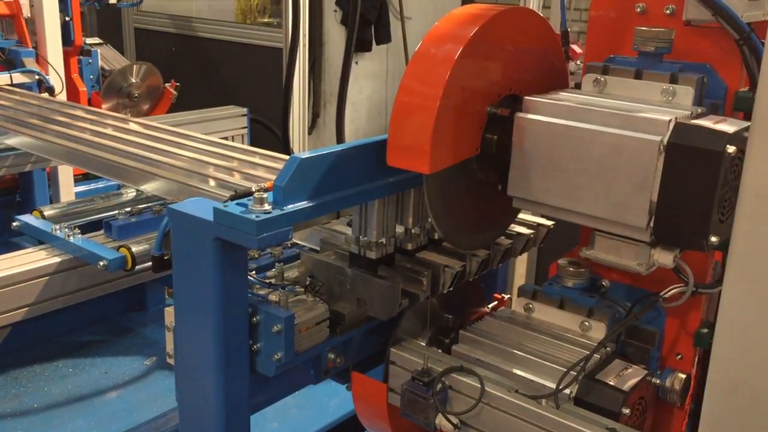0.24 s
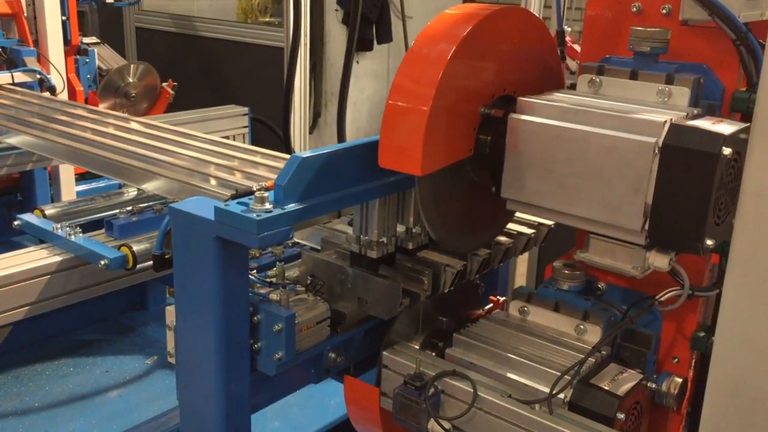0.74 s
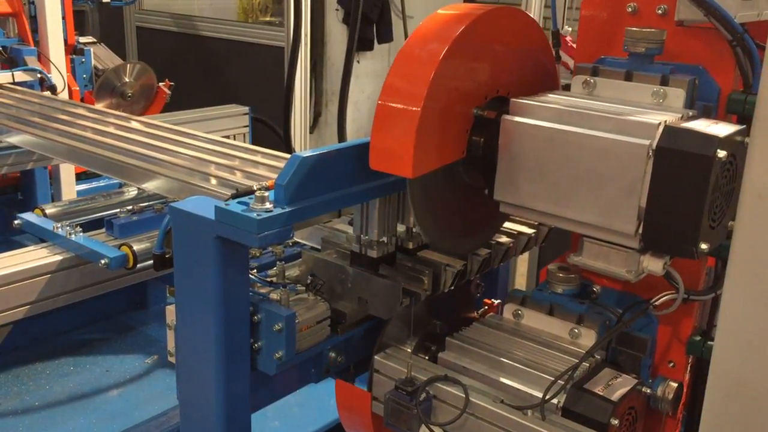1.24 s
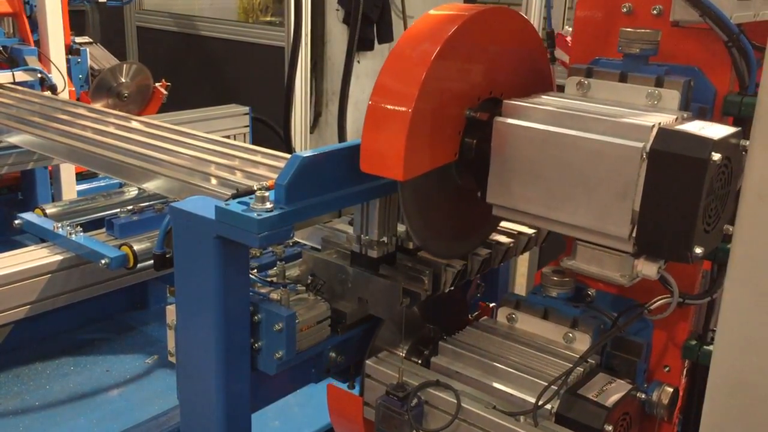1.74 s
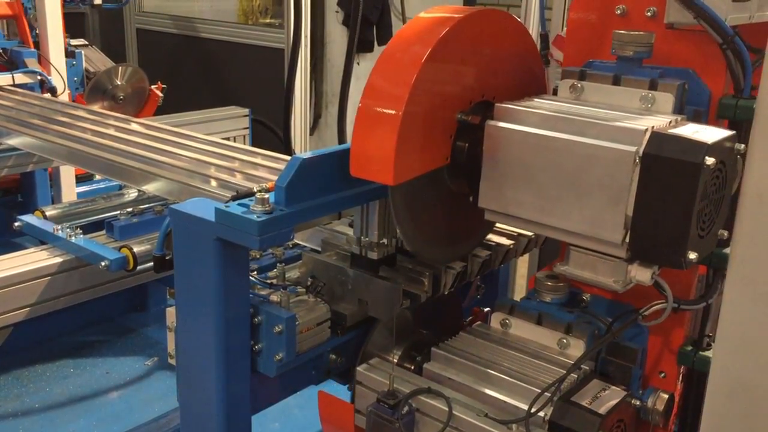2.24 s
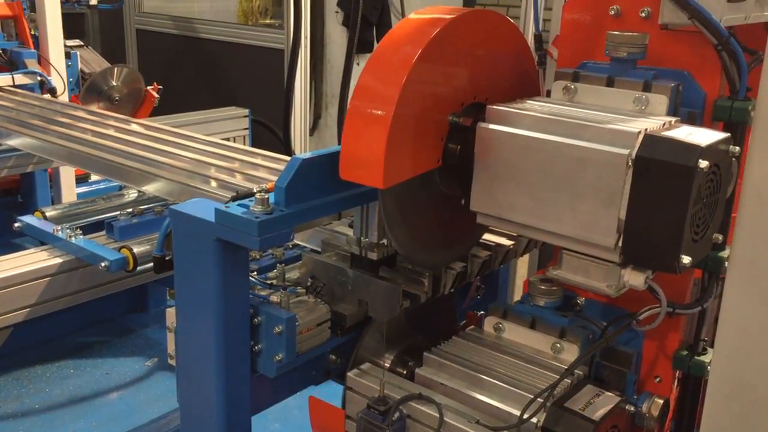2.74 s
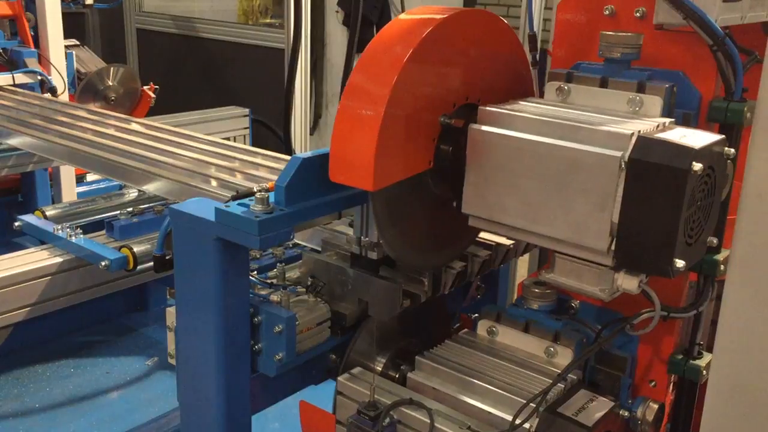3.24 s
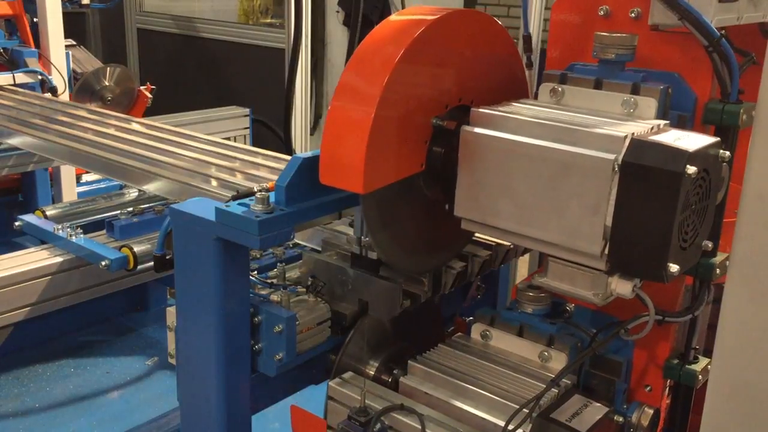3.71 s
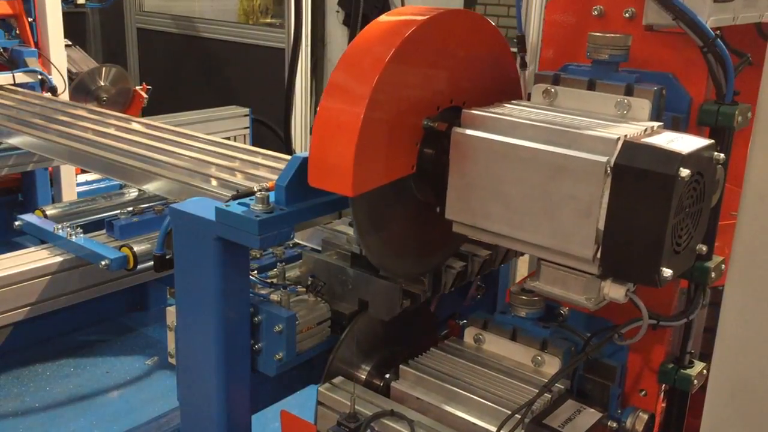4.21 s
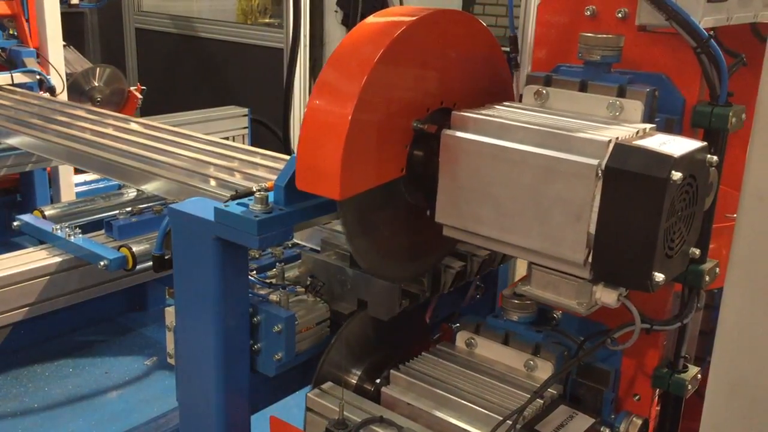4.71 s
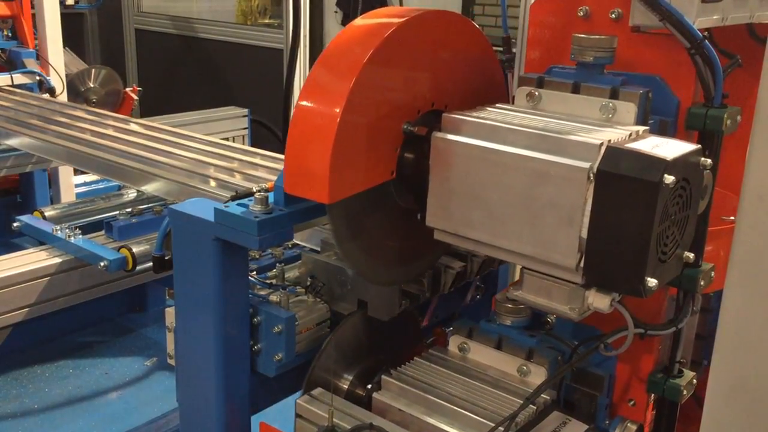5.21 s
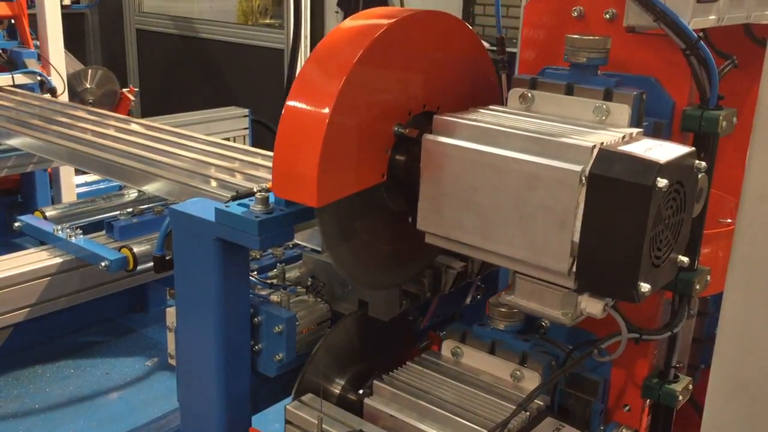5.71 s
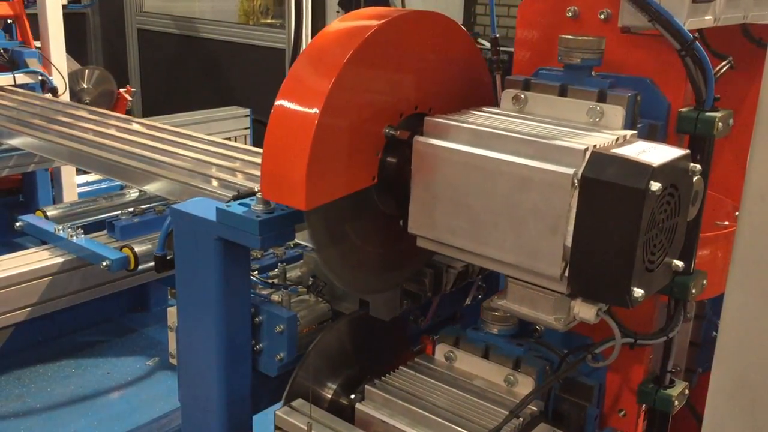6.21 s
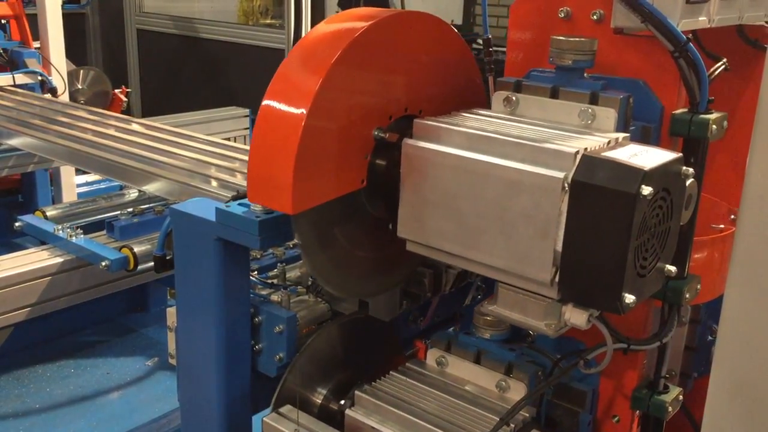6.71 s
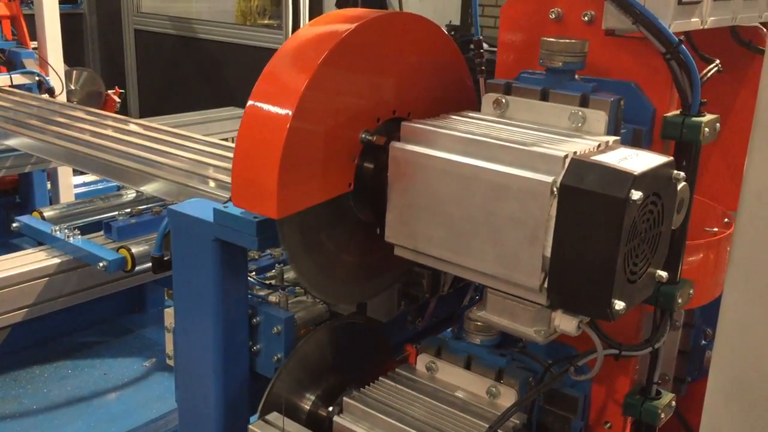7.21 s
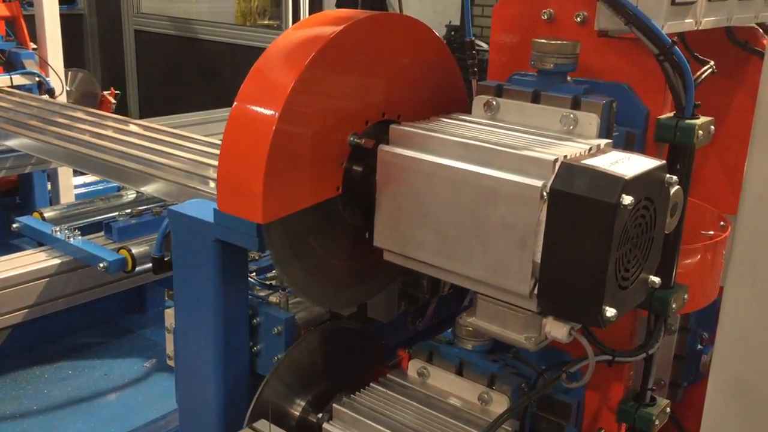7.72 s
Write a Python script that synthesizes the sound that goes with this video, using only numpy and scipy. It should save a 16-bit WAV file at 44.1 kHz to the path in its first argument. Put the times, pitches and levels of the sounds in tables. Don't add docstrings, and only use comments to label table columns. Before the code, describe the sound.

Harsh metallic milling of hollow aluminium in a workshop, shrill and fluttering, ends in a howl and scrapes, leaving steady machine hum and whoosh.

```python
import sys
import numpy as np
from scipy import signal
from scipy.fft import rfft, irfft, next_fast_len
from scipy.io import wavfile
from scipy.ndimage import uniform_filter1d, map_coordinates

SR = 44100
rng = np.random.default_rng(int(sys.argv[2]) if len(sys.argv) > 2 else 0)


def to_linear_factor(level_db):
    exponent = np.asarray(level_db, float) / 20
    return 10 ** exponent


def generate_wav(sig):
    pcm = np.round(np.clip(np.atleast_2d(sig).T, -1, 1) * 32767).astype(np.int16)
    wavfile.write(sys.argv[1], SR, pcm)


N = 350595
T = np.arange(N) / SR

TEETH = 108
TOP_HZ = 15740
OCTAVE_BEAT_S, OCTAVE_NULL_S, OCTAVE_BEAT_DEPTH = 0.135, 0.357, 0.92
NEAR_LINES_DB, FAR_LINES_DB, FREE_DB, SETTLED_S, SETTLED_DB = -40, -55, 5, 3.1, -9
LOW_GROWS, MID_GROWS = 0.35, 1.24
UP_SHIFTS, RIM_SHIFTS, WEB_SHIFTS = 0.77, -0.63, 0.12
FLANGE_RESTS = .85
EDGE_SAG_HZ_PER_S = 450
HIGH_SPOT_DB, HIGH_SPOT_SCATTER_DB = 9, 1
RUMBLE_DB = -16
MAINS_DB, MAINS_GROWS, FIRST_DB, FIRST_GROWS = -49.5, 0.61, -48, 1.32
RIDGE_FLICKER_DB, RIDGE_WANDER = 2.5, .6
PLUCK_HZ, PLUCK_UPPER_HZ, PLUCK_UPPER_DB = 1810, 3590, -9.5

# (time [s], tooth rate [Hz], whistle level [dB], octave level [dB])
SPINDLE = [(0, 5386, -28, -30), (.2, 5388, -24, -30), (.42, 5379, -24, -27), (.51, 5361, -22, -33),
           (.68, 5371, -18, -39), (.84, 5362, -21, -33), (1.05, 5367, -21, -31), (1.25, 5365, -26, -34),
           (1.39, 5374, -31, -35), (1.52, 5382, -21, -30), (1.69, 5360, -24, -36), (1.74, 5380, -24, -31),
           (2.0, 5387, -22.5, -31), (2.3, 5385, -24, -32), (2.6, 5389, -30, -42), (2.92, 5390, -34, -40),
           (4.2, 5387, -35, -42), (4.42, 5390, -43, -62)]
# (peak time [s], level [dB], rise [s], fall for 10 dB [s])
WHISTLE_SWELLS = [
    (.43, -13.5, 0.056, .045),
    (.845, -27, .04, .07),
    (.912, -22, .07, .045),
    (1.19, -24.5, 0.053, .09),
    (1.27, -22, 0.038, .013),
    (1.672, -15, .12, 0),
]
# (time [s], depth [dB], half width [s])
WHISTLE_NULLS = [
    (.51, 7, 0.025),
    (.788, 18, 0.021),
    (1.11, 16, 0.041),
]
# (peak time [s], level [dB], rise [s], fall for 10 dB [s])
OCTAVE_SWELLS = [
    (.576, -33, .04, .09),
    (.805, -25.5, 0.038, 0.15),
    (1.24, -32.5, .05, 0.15),
]
# (time [s], level [dB])
HALF_RATE = [
    (.7, -70),
    (.76, -37),
    (.95, -43),
    (1.0, -54),
    (1.08, -35),
    (1.38, -36),
    (1.46, -70),
]
# (time [s], frequency [Hz], level [dB])
SQUEAL = [
    (0.99, 2270, -38),
    (1.056, 2354, -22),
    (1.19, 2324, -17.5),
    (1.254, 2255, -30),
    (1.28, 2369, -34),
]
LINES_ABOVE_DB = [0, -1, -7, -6]
LINES_BELOW_DB = [-9, -7, -6, -10]
# (time [s], level [dB], pitch shift [share])
SHAKE = [(.06, -42, -0.012), (.11, -25.5, -0.002), (.49, -19.5, 0.0067), (.58, -22, -.03), (.62, -31, 0),
         (1.4, -33.5, 0.0033), (1.62, -29, .03), (1.8, -39, -0.032), (1.97, -28.5, -0.0074),
         (2.37, -24, .02), (2.48, -27, -0.057), (2.52, -36, -.02), (2.91, -30, 0.0063), (2.97, -28, 0.0072),
         (3.24, -32, 0.0018), (3.76, -23, -0.073), (4.11, -16, 0.08), (4.33, -18, -.04)]
# (time [s], level [dB])
CONTACT = [(0, -44), (.015, -36), (.35, -31.5), (.585, -34), (.63, -46), (.84, -42), (1.25, -40.5),
           (1.4, -42), (2.47, -34), (2.57, -47), (2.92, -38), (2.94, -34), (3.03, -38), (3.08, -33.5),
           (3.2, -36.5), (3.5, -31.5), (4.31, -33), (4.37, -40)]
WALL_S = [
    .62,
    2.14,
    2.9,
    3.5,
]
# (low [dB], middle [dB], upper [dB])
WALL_DB = [(-13, -4.5, -2.5), (-15, -17, 0.5), (-7.5, -1, -1), (-2.5, -16, 0.5), (-3.5, -3.5, -1.5)]
# (low [Hz], middle [Hz], upper [Hz])
WALL_HZ = [(1510, 1870, 3900), (1533, 1830, 3910), (1516, 1887, 3930), (1513, 1850, 3850),
           (1480, 1863, 4030)]
# (rim [dB], web [dB], edge [dB], chips [dB])
DISC_DB = [(5, 4, -5, 1), (-1, 1.2, -4, 0.5), (-3, 4.5, -7, 1.5), (7.5, 6, 5, -1), (6.5, 2.5, 4, -0.3)]
# (rim [Hz], web [Hz], edge [Hz])
DISC_HZ = [(7300, 8830, 14650), (7180, 8830, 14750), (7020, 8800, 14250), (7200, 8990, 14300),
           (7070, 9030, 14200)]
# (frequency [Hz], width [Hz])
LOW_MODES = [(1450, 45), (1485, 12), (1550, 8)]
MID_MODES = [(1700, 110), (1790, 53), (1860, 29), (1920, 77), (1980, 10), (2060, 50)]
UP_MODES = [(3250, 170), (3450, 23), (3680, 36), (3900, 58), (4040, 170), (4230, 52), (4400, 150),
            (4580, 210)]
RIM_MODES = [(6720, 55), (6900, 120), (7160, 110), (7340, 73), (7600, 130)]
WEB_MODES = [(8810, 70), (9040, 36)]
EDGE_MODES = [(13850, 110), (14150, 110), (14480, 120), (14800, 250)]
# (start [s], length [s])
BETWEEN = (2.52, 0.41)
# (peak time [s], level [dB], rise [s], fall for 10 dB [s])
FLANGE_SWELLS = [
    (.12, -28, .05, 0.3),
    (.74, -33, .06, 0.2),
    (1.62, -25.5, .17, 0.45),
    (1.86, -32, 0.056, 0.4),
    (2.49, -26, .08, 0.1),
    (2.97, -27, 0.048, 0.4),
    (3.1, -24, 0.027, 0.2),
    (4.31, -28, 0.096, 8),
]
# (peak time [s], level [dB], rise [s], fall for 10 dB [s])
EDGE_SONG = [(3.8, -28, .2, .3)]
# (time [s], depth [dB], half width [s])
EDGE_FADE = [(4.28, 9.6, 0.16)]
# (frequency [Hz], density [dB per Hz])
CHIPS = [(530, -50), (900, -22.5), (1470, 1), (3720, -2.5), (5080, -8), (5460, -3.5), (6300, -8.5),
         (7270, -7), (11900, -8), (14300, -9), (15600, -12)]
# (time [s], roar level [dB])
GAIN = [(0, -27.5), (.4, -26.5), (.8, -30), (1.8, -31), (2.5, -30), (2.9, -25), (3.4, -23), (3.9, -24),
        (4.35, -26), (4.66, -28), (4.9, -23.5), (5.1, -21), (7.95, -20.5)]
# (frequency [Hz], density [dB per Hz])
ROAR = [(530, -34), (900, -12.5), (1370, -4.5), (1520, -5), (1890, 0), (2370, -1), (2570, -1), (4150, -7),
        (5020, -12.5), (6450, -13), (8290, -16.5), (10500, -19), (12000, -20), (15600, -21)]
RUMBLE = [(28, -41), (48, -11.5), (97, -2.5), (192, -5), (241, -5), (455, -3), (609, -6), (1000, -9),
          (1300, -20), (2200, -120)]
# (frequency [Hz], level [dB])
MOTORS = [(667.5, -54), (899, -53), (2045, -43), (3778, -42), (4000, -41), (4221, -45), (4801, -41.5),
          (8000, -51), (11978, -60)]
# (time [s], level over roar [dB])
SECOND_MOTOR = [(.2, -19), (1.55, -12), (2.6, -21), (3.56, -12), (4.6, -12), (5.55, -16.5), (6.1, -24),
                (7.95, -21.5)]
# (peak time [s], level [dB], rise [s], fall for 10 dB [s])
THUD = [(3.75, -49, .5, -0.5)]
# (start [s], length [s], frequency [Hz], width [Hz], level [dB])
RIDGES = [(.1, .12, 1845, 20, -33), (.1, .08, 1500, 30, -32), (.3, .07, 1860, 35, -30),
          (.37, .13, 1950, 60, -28), (.44, .17, 1790, 40, -28), (.35, .19, 3550, 120, -27),
          (.38, .11, 3200, 70, -29), (.39, .19, 4230, 60, -31), (.22, .12, 3980, 120, -30),
          (2.0, .1, 2200, 50, -38), (2.13, .08, 3650, 40, -33), (2.24, .15, 3910, 50, -31),
          (2.3, .08, 4400, 40, -34), (2.42, .1, 1552, 12, -30), (2.42, .07, 3850, 40, -33),
          (2.17, .04, 1900, 60, -30), (2.24, .1, 1910, 50, -31), (3.84, .26, 3450, 40, -32),
          (4.03, .19, 4200, 150, -25), (4.06, .18, 3910, 30, -29), (3.83, .09, 1900, 200, -24),
          (4.16, .17, 1970, 50, -25), (4.24, .08, 1500, 30, -30), (3.5, .3, 12400, 80, -40),
          (2.93, .5, 13850, 200, -39), (4.472, .14, 7200, 80, -35), (4.475, .135, 14050, 200, -42),
          (3.45, .6, 1465, 30, -33), (3.47, .1, 1650, 60, -31), (3.62, .22, 1750, 70, -33),
          (3.5, .22, 2320, 40, -34), (3.68, .12, 4150, 200, -30), (3.84, .15, 4150, 250, -28),
          (.25, .15, 1470, 30, -33),
          (.94, .065, 9900, 120, -36), (.99, .045, 9620, 100, -34), (1.02, .04, 9350, 120, -35),
               (.565, .04, 8850, 80, -32), (1.04, .13, 8400, 10, -43), (1.15, .08, 10050, 15, -42),
               (1.25, .045, 7300, 400, -36), (1.255, .035, 11600, 800, -38), (1.9, .6, 14250, 300, -41),
               (3.12, .25, 9035, 15, -36), (4.06, .2, 6650, 60, -35), (2.6, 1.2, 15500, 300, -43)]
# (start [s], length [s], frequency [Hz], width [Hz], level [dB])
CHIRPS = [(1.25, 0.045, 6200, 400, -28), (1.278, 0.39, 2250, 83, -33), (3.075, 0.06, 990, 60, -36),
          (3.2, .5, 2495, 50, -35), (3.45, 0.38, 3700, 25, -32), (3.09, 0.035, 2200, 150, -26),
          (3.66, 0.67, 5790, 30, -41), (3.45, .5, 3660, 40, -36), (0.11, 0.5, 2400, 100, -40),
          (3.088, .032, 1600, 10, -21), (3.062, .06, 8750, 40, -28), (.51, .12, 7140, 30, -31),
         (.62, .36, 9750, 150, -42), (4.17, .16, 1800, 35, -22), (4.472, .145, 8930, 90, -32),
         (3.063, .035, 5050, 80, -29)]
# (start [s], length [s], frequency [Hz], level [dB])
NOTES = [(3.3, .4, 9035, -32), (.11, .3, 1470, -35), (.77, .27, 4040, -35), (1.25, .45, 4120, -39),
         (.7, .5, 4580, -43), (1.36, .44, 1552, -32), (1.79, .12, 3490, -33.5), (1.8, .08, 1920, -33),
         (1.95, .18, 3610, -33), (2.4, .1, 3580, -32), (2.93, .075, 1478, -27), (2.15, .15, 4400, -34)]
# (time [s], peak level [dB], length [s])
RATTLE = [(3.075, -8, .008), (3.085, -6, .004), (3.096, -11, .006), (3.105, -5, .005), (3.112, -9, .007),
          (3.123, -8, .004), (3.146, -5, .005), (3.154, -12, .004), (3.165, -11, .007)]
# (frequency [Hz], width [Hz], level [dB])
OFFCUT_MODES = [(1640, 63, 0), (1960, 42, -13), (2270, 44, 2), (3040, 21, -4), (3270, 19, -3),
                (3650, 100, -8), (4400, 150, -11), (5000, 49, -13)]
# (time [s], peak level [dB], length [s])
GRAZES = [
    (4.477, -5, 0.012),
    (4.513, -14, 0.01),
    (4.521, -5, 0.015),
    (4.547, -8, 0.012),
    (4.577, -6, 0.006),
    (4.585, -9, .016),
]
# (frequency [Hz], width [Hz], level [dB])
GRAZED_MODES = [(1780, 65, 2), (3550, 32, 0), (3890, 39, -7), (4100, 49, -8), (4520, 150, -13),
                (5300, 25, -15), (7150, 64, -14), (8850, 91, -10), (9550, 44, -16), (14050, 130, -19)]
# (time [s], frequency [Hz], level [dB])
HOWL = [
    (3.86, 1960, -36),
    (3.92, 1972, -27),
    (4.0, 1985, -19),
    (4.06, 2015, -17),
    (4.13, 2040, -19),
    (4.18, 2040, -25),
    (4.22, 2030, -45),
]
# (peak time [s], level [dB], rise [s], fall for 10 dB [s])
PLUCKS = [
    (4.48, -14, .005, .006),
    (4.522, -12, .007, .005),
    (4.547, -18, .004, .006),
    (4.583, -14, .008, .006),
]


def curves(rows, off=None):
    times_s, *columns = np.transpose(rows)
    return [np.interp(T, times_s, column, off, off) for column in columns]


def unit(x):
    return x / np.sqrt(np.mean(np.abs(x) ** 2) + 1e-20)


def wobble(rate_hz):
    return map_coordinates(rng.standard_normal(int(N * rate_hz / SR) + 4), [T * rate_hz])


def cycles(hz):
    return 2 * np.pi * np.cumsum(hz * np.ones(N)) / SR


def gate(start_s, length_s, edge_s):
    return np.clip(np.minimum(T - start_s, start_s + length_s - T) / edge_s, 0, 1)


def swells(rows):
    return sum(to_linear_factor(db - 10 * ((T - s) / np.where(T < s, rise_s, fall_s)) ** 2) for s, db, rise_s, fall_s in rows)


def nulls(rows):
    return to_linear_factor(-sum(db * np.exp(-((T - s) / width_s) ** 2) for s, db, width_s in rows))


def ringing(hz, width_hz):
    drift = rng.standard_normal((2, N))
    for poles in (1, 3):
        drift = signal.lfilter([1], [1, -np.exp(-poles * np.pi * width_hz / SR)], drift)
    phase = cycles(hz)
    return unit(drift[0] * np.cos(phase) + drift[1] * np.sin(phase))


def rush(spectrum, patchy_db):
    bins = signal.stft(rng.standard_normal(N), nperseg=512)[2]
    patches = uniform_filter1d(uniform_filter1d(rng.standard_normal(bins.shape), 6, 0), 12, 1)
    noise = signal.istft(bins * to_linear_factor(patchy_db * unit(patches)), nperseg=512)[1][:N]
    hz, db = np.transpose(spectrum)
    size = next_fast_len(N)
    log_hz = np.log(np.fft.rfftfreq(size, 1 / SR) + 1)
    colour = to_linear_factor(np.interp(log_hz, np.log(hz), db, left=-120))
    return unit(irfft(rfft(noise, size) * colour, size)[:N])


def runout(tooth):
    def line(phase, db):
        return to_linear_factor(db) * np.sin(phase + rng.uniform(0, 2 * np.pi))

    settled_db = SETTLED_DB * gate(SETTLED_S - .15, N / SR, .3)
    turn, orders = tooth / TEETH, range(1, 13)
    near = sum(line(tooth + k * turn, db + 3.4 * wobble(4.9)) for k, db in zip(orders, LINES_ABOVE_DB))
    near += sum(line(tooth - k * turn, db + 1.5 * wobble(4.9)) for k, db in zip(orders, LINES_BELOW_DB))
    far = 0
    for k in orders:
        far = far + line(2 * tooth + k * turn, rng.normal(0, 3) - .4 * k)
        far = far + line(2 * tooth - k * turn, rng.normal(0, 3) - .8 * k)
    far_db = FAR_LINES_DB + FREE_DB * gate(*BETWEEN, .1) + settled_db / 4
    return to_linear_factor(NEAR_LINES_DB + settled_db) * near + to_linear_factor(far_db) * far


def squeal(tooth):
    wall_hz, wall_db = curves(SQUEAL)
    wall = cycles(wall_hz)
    mixed = to_linear_factor(-17.5) * np.sin(tooth - wall) + to_linear_factor(-19) * np.sin(tooth + wall)
    mixed += to_linear_factor(-16) * np.sin(2 * tooth + wall) + to_linear_factor(-25) * np.sin(2 * tooth - wall)
    mixed += to_linear_factor(-29) * np.sin(2 * wall)
    return to_linear_factor(wall_db) * gate(0.97, 0.34, .03) * (np.sin(wall) + mixed)


def whistle():
    hz, db, octave_db = curves(SPINDLE)
    tooth = cycles(hz)
    base = (to_linear_factor(db) + swells(WHISTLE_SWELLS)) * nulls(WHISTLE_NULLS) * to_linear_factor(0.69 * wobble(40.24))
    dip = 1 - np.abs(np.sin(np.pi * (T - OCTAVE_NULL_S) / OCTAVE_BEAT_S))
    beat = 1 - OCTAVE_BEAT_DEPTH * gate(0.27, 1.15, 0.073) * dip
    octave = beat * to_linear_factor(octave_db + 1.2 * wobble(40.0) + 1.3 * wobble(5.8)) + swells(OCTAVE_SWELLS)
    strikes = base * np.sin(tooth) + octave * np.sin(2 * tooth) + runout(tooth)
    halves = np.sin(tooth / 2) + to_linear_factor(-11) * np.sin(1.5 * tooth) + to_linear_factor(-7) * np.sin(2.5 * tooth)
    halves *= to_linear_factor(curves(HALF_RATE)[0] + 3.0 * wobble(11.9))
    return np.sqrt(2) * (gate(-0.98, 5.6, .06) * strikes + halves + squeal(tooth))


def family(modes, centre_hz, reach_hz, flicker_db):
    shares = [np.exp(-((hz - centre_hz) / reach_hz) ** 2) + .02 for hz, _ in modes]
    rung = sum(share * to_linear_factor(flicker_db * wobble(18)) * ringing(hz, width_hz)
               for share, (hz, width_hz) in zip(shares, modes))
    return unit(rung / np.sqrt(np.sum(np.square(shares), axis=0)))


def by_wall(rows):
    values = np.array(rows, float)[np.searchsorted(WALL_S, T)].T
    return uniform_filter1d(values, size=SR // 24, axis=1)


def chatter(turn):
    sink = (turn / (2 * np.pi)) % 1
    gain = to_linear_factor(-HIGH_SPOT_DB * sink + HIGH_SPOT_SCATTER_DB * wobble(50))
    return np.where(T > WALL_S[2], unit(uniform_filter1d(gain, size=SR // 500)), 1)


def profile():
    shake_db, shift = curves(SHAKE)
    over_db = shake_db + 25
    low_db, mid_db, up_db = by_wall(WALL_DB)
    low_hz, mid_hz, up_hz = by_wall(WALL_HZ)
    low = to_linear_factor(low_db + LOW_GROWS * over_db - 31.0) * (1 - FLANGE_RESTS * gate(*BETWEEN, .02))
    low += to_linear_factor(-10.0) * swells(FLANGE_SWELLS)
    mid = to_linear_factor(mid_db + MID_GROWS * over_db - 29.5)
    up = to_linear_factor(up_db + shake_db - 1.5)
    rung = low * family(LOW_MODES, low_hz, reach_hz=35, flicker_db=0.5)
    rung += mid * family(MID_MODES, mid_hz * (1 + shift), reach_hz=100, flicker_db=1.5)
    return rung + up * family(UP_MODES, up_hz * (1 + UP_SHIFTS * shift), reach_hz=645, flicker_db=1.0)


def disc_and_chips(turn):
    shift = curves(SHAKE)[1]
    rim_db, web_db, edge_db, chips_db = by_wall(DISC_DB) + curves(CONTACT)[0]
    rim_hz, web_hz, edge_hz = by_wall(DISC_HZ)
    rim_hz = rim_hz * (1 + RIM_SHIFTS * shift)
    web_hz = web_hz * (1 + WEB_SHIFTS * shift)
    edge_hz = edge_hz - EDGE_SAG_HZ_PER_S * np.clip(T - 3.85, -.35, .5)
    rim = to_linear_factor(rim_db - 3.0) * np.sqrt(chatter(turn))
    edge = (to_linear_factor(edge_db + 2.0) + swells(EDGE_SONG)) * nulls(EDGE_FADE) * chatter(turn)
    web = 0.84 * family(WEB_MODES, web_hz, reach_hz=110, flicker_db=0.5) + 0.72 * ringing(web_hz, 380)
    disc = rim * family(RIM_MODES, rim_hz, reach_hz=387, flicker_db=2)
    disc += to_linear_factor(web_db - 1.4) * web
    disc += edge * family(EDGE_MODES, edge_hz, reach_hz=330, flicker_db=1.5)
    disc *= 1 - 0.5 * gate(*BETWEEN, 0.018)
    return disc + to_linear_factor(chips_db + 10) * rush(CHIPS, patchy_db=2.1)


def cut():
    turn = cycles(curves(SPINDLE)[0] / TEETH + 0.73 * wobble(5.07))
    pulse_db = 1.7 * np.sin(turn) + .6 * np.sin(2 * turn + 1) + .9 * np.sin(4 * turn) + 1.05 * wobble(30)
    return gate(-1, 5.345, .025) * unit(to_linear_factor(pulse_db)) * (profile() + disc_and_chips(turn))


def shop():
    roar_db, = curves(GAIN)
    over_db = roar_db + 25
    noise = to_linear_factor(roar_db + RUMBLE_DB) * rush(RUMBLE, patchy_db=1.16)
    noise += to_linear_factor(roar_db + 0.17 * wobble(9)) * rush(ROAR, patchy_db=0.5)
    noise += swells(THUD) * rush([(28, -24.5), (50, 0), (110, -4), (200, -30)], patchy_db=1.0)
    mains = to_linear_factor(MAINS_DB + MAINS_GROWS * over_db + 1.3 * wobble(2.02)) * nulls([(4.7, 4.5, 0.24)])
    first = to_linear_factor(FIRST_DB + FIRST_GROWS * over_db)
    second = to_linear_factor(roar_db + curves(SECOND_MOTOR)[0]) * nulls([(6.64, 11, 0.037)])
    hum = mains * np.sin(cycles(100))
    hum += first * np.sin(cycles(244.3 + 0.26 * wobble(1.85)))
    hum += second * np.sin(cycles(449.2 + 0.4 * wobble(1.97)))
    tones = sum(to_linear_factor(db + 1.5 * wobble(4)) * np.sin(cycles(hz + 1.5 * wobble(6))) for hz, db in MOTORS)
    return noise + np.sqrt(2) * (hum + to_linear_factor(roar_db + 21) * tones)


def ridges():
    total = np.zeros(N)
    for start_s, length_s, hz, width_hz, db in RIDGES:
        wander_hz = RIDGE_WANDER * width_hz * wobble(30 + width_hz)
        ragged = to_linear_factor(RIDGE_FLICKER_DB * wobble(45)) * np.sin(cycles(hz + wander_hz))
        total += to_linear_factor(db) * gate(start_s, length_s, length_s / 6) * ragged
    return np.sqrt(2) * total


def chirps():
    total = np.zeros(N)
    for start_s, length_s, hz, width_hz, db in CHIRPS:
        total += to_linear_factor(db) * gate(start_s, length_s, length_s / 6) * ringing(hz, width_hz)
    for start_s, length_s, hz, db in NOTES:
        note = to_linear_factor(2.5 * wobble(25)) * np.sqrt(2) * np.sin(cycles(hz + 9 * wobble(20)))
        total += to_linear_factor(db) * gate(start_s, length_s, 0.024) * note
    return total


def touches(events, modes, hiss, rise_s, tail_s):
    body = sum(to_linear_factor(db) * np.sqrt(width_hz) * ringing(hz, 2.0 * width_hz) for hz, width_hz, db in modes)
    scrape = unit(body) + hiss * rush(CHIPS, patchy_db=-3.0)
    scrape = scrape / np.sqrt(np.abs(uniform_filter1d(scrape ** 2, size=SR // 120)) + .05)
    level = np.zeros(N)
    for s, db, length_s in events:
        after_s = np.maximum(T - (s - .003), 0)
        decay = np.exp(-(after_s / length_s) ** 2) + .25 * to_linear_factor(-60 * after_s / tail_s)
        level += to_linear_factor(db - 9.0) * np.minimum(after_s / rise_s, 1) * decay
    return scrape * level


def grazes():
    offcut = touches(RATTLE, OFFCUT_MODES, hiss=0.38, rise_s=0.0015, tail_s=0.08)
    return offcut + touches(GRAZES, GRAZED_MODES, hiss=0.39, rise_s=0.0035, tail_s=0.31)


def howl():
    hz, db = curves(HOWL)
    tone = gate(3.85, .38, .02) * to_linear_factor(db + 2.5 * wobble(35)) * np.sin(cycles(hz + 16 * wobble(45)))
    lower = np.sin(cycles(PLUCK_HZ + 25 * wobble(40)))
    upper = to_linear_factor(PLUCK_UPPER_DB + 2.2 * wobble(60)) * np.sin(cycles(PLUCK_UPPER_HZ + 80 * wobble(90)))
    return np.sqrt(2) * (tone + swells(PLUCKS) * (lower + upper))


def scene():
    mono = whistle() + cut() + shop() + ridges() + chirps() + grazes() + howl()
    return np.tile(mono, (2, 1))


def roll_off(x):
    return signal.sosfilt(signal.butter(12, 16870, fs=SR, output="sos"), x)


def record(dry):
    soft = dry / (1 + np.abs(dry / .75) ** 5) ** (1 / 5)
    size = next_fast_len(N)
    in_band = np.fft.rfftfreq(size, 1 / SR) < TOP_HZ
    mix = irfft(rfft(soft, size) * in_band, size)[:, :N]
    return roll_off(mix)


dry = scene()
out = record(dry)
generate_wav(out)
```